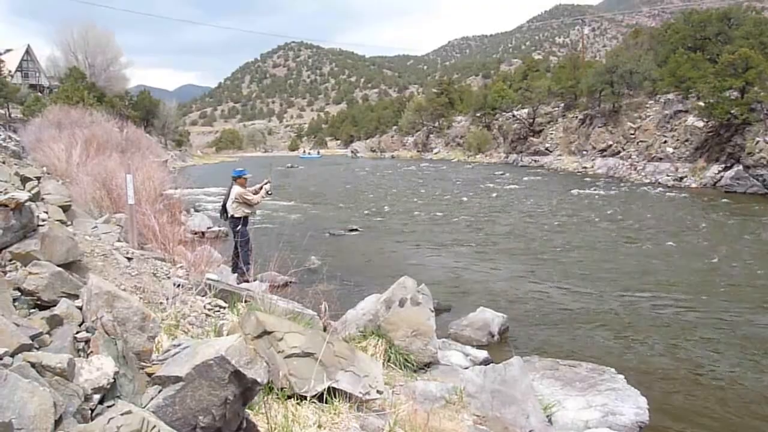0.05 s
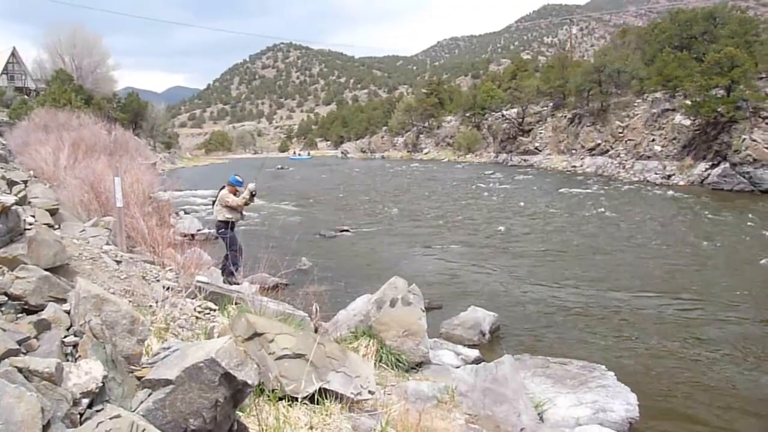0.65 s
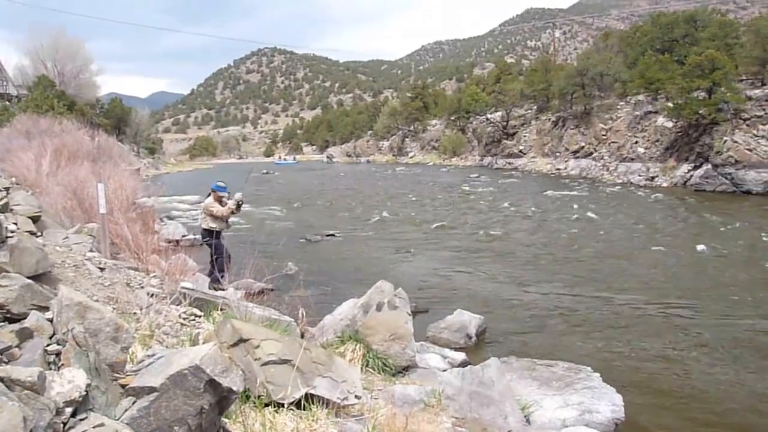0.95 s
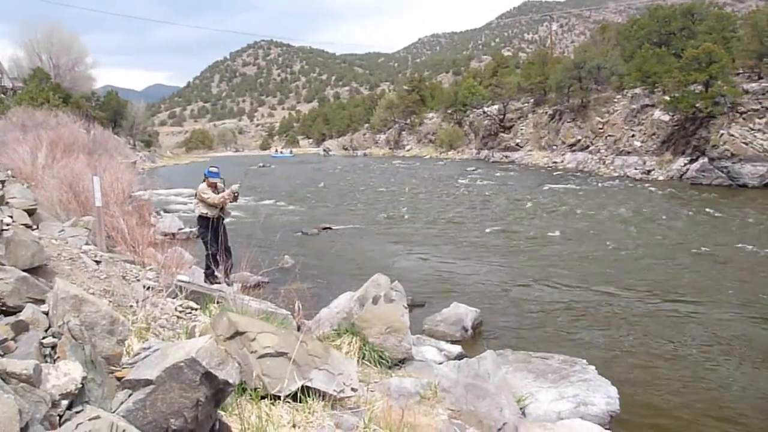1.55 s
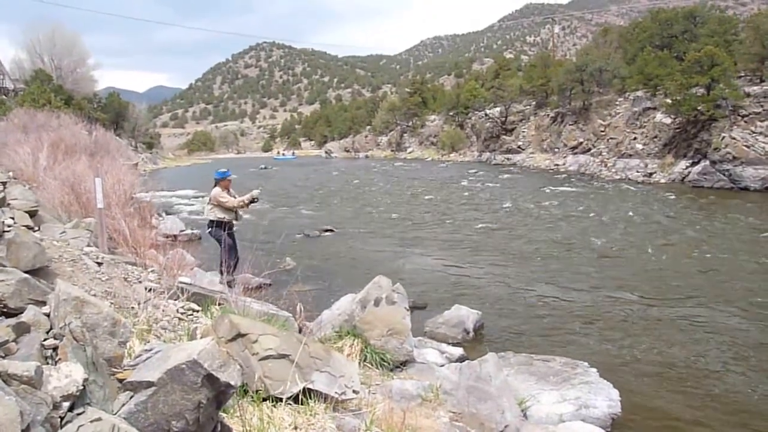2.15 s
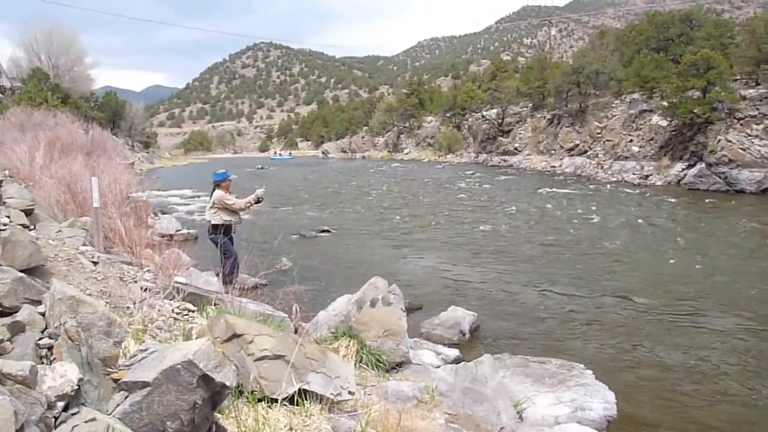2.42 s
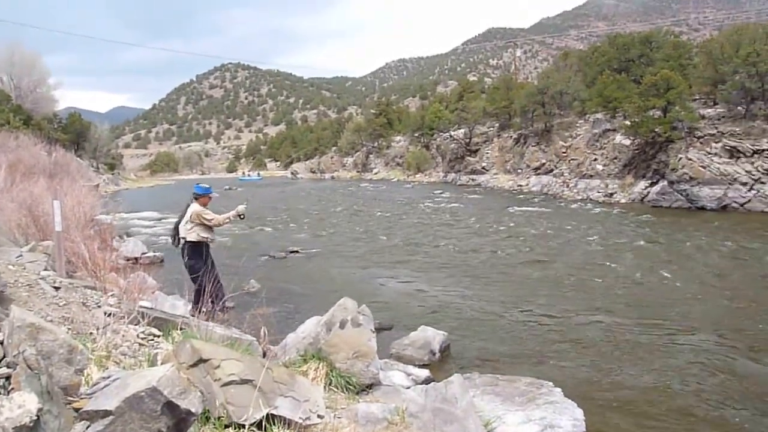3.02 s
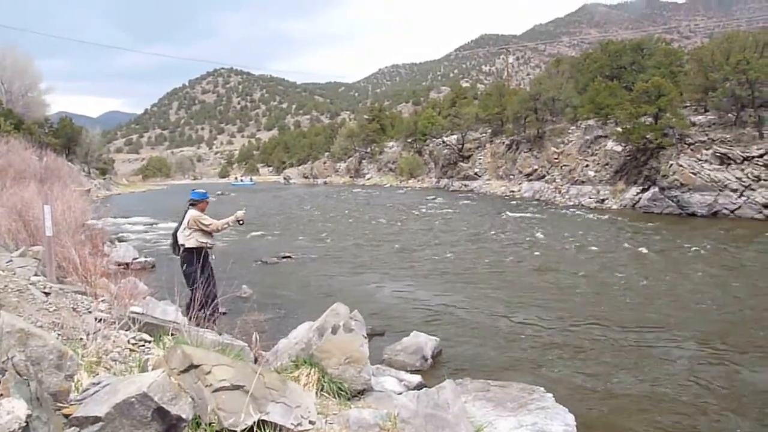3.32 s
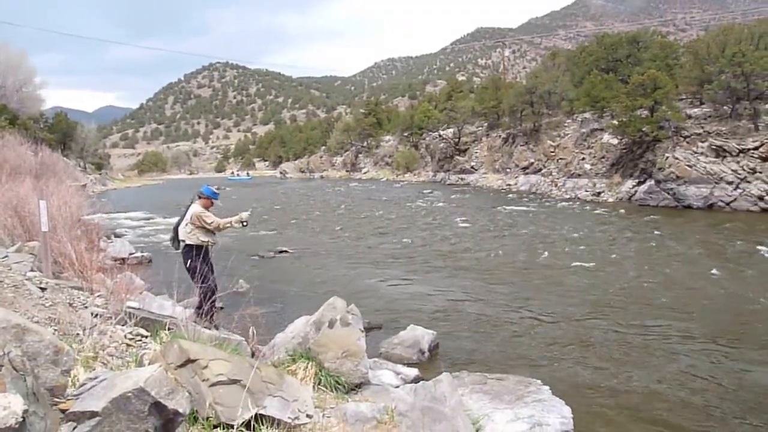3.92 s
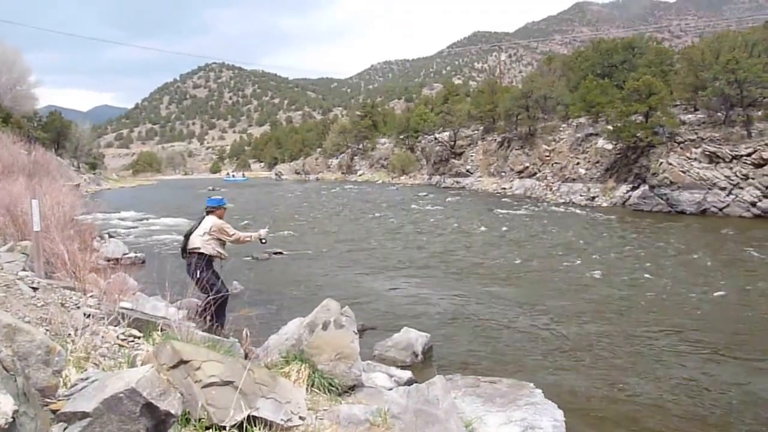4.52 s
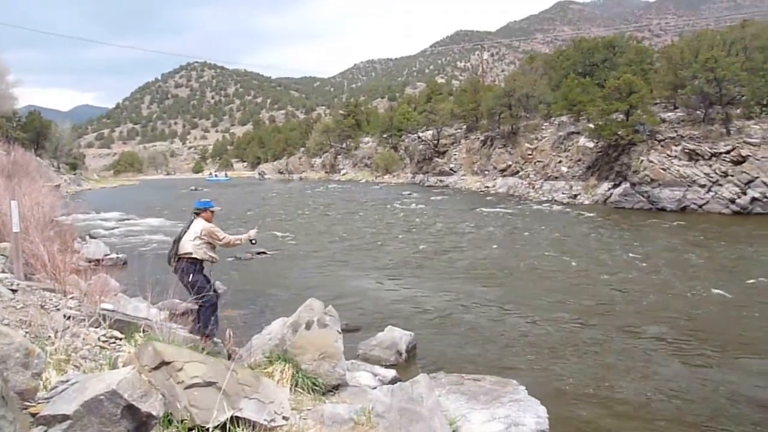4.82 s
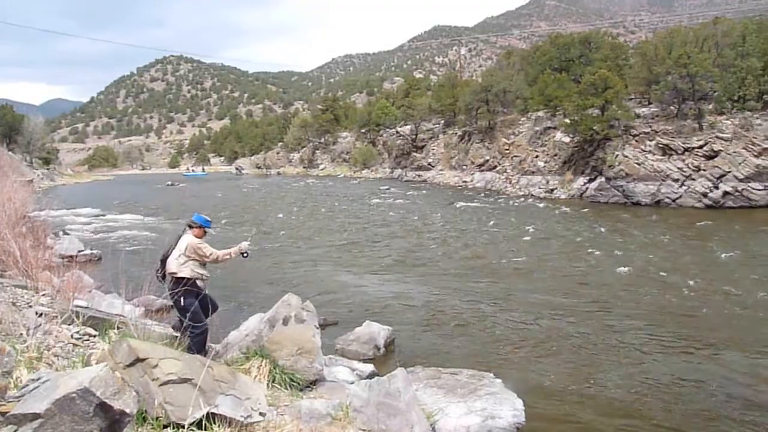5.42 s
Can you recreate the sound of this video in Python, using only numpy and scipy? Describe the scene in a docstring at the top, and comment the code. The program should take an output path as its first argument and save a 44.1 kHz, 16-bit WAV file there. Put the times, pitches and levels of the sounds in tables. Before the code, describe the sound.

A wide river rushes steadily while a gust of wind rumbles and thumps on the microphone, then dies away.

```python
"""A wide, quick river, heard from its rocky bank on the microphone of a small hand-held camera.
From the start, distant riffles churn and burst into countless bubbles over the camera's own hiss and whine.
After about a second a gust crosses the microphone: it rumbles, and its eddies thump the diaphragm.
The gust dies away around four seconds; one last eddy hits near five, and the water rushes on."""
import sys
import numpy as np
from scipy import signal
from scipy.fft import rfft, irfft, next_fast_len
from scipy.io import wavfile
from scipy.ndimage import uniform_filter1d

SR = 44100
rng = np.random.default_rng(int(sys.argv[2]) if len(sys.argv) > 2 else 0)


def transcribe(signal):
    """Save signal, clipped to [-1, 1], as a 16-bit WAV file at the path in sys.argv[1]."""
    frames = np.atleast_2d(signal).T
    limited = np.clip(frames, -1, 1)
    pcm = np.round(limited * 32767).astype(np.int16)
    wavfile.write(sys.argv[1], SR, pcm)


N = 249606
TIME = np.arange(N) / SR


def undb(db):
    """Decibels to gain."""
    return 10 ** (np.asarray(db) / 20)


def level(x, db):
    """Scale a sound to an rms level."""
    return x * undb(db) / np.sqrt(np.mean(x ** 2))


def colour(x, spectrum):
    """Filter by a curve through rows of frequency_hz, gain_db."""
    hz, db = np.transpose(spectrum)
    size = next_fast_len(N)
    bin_hz = np.maximum(np.fft.rfftfreq(size, 1 / SR), 1)
    gain = undb(np.interp(np.log(bin_hz), np.log(hz), db))
    return irfft(rfft(x, size) * gain, size)[:N]


def wander(rate_hz):
    """A smooth random drift that takes a new course rate_hz times a second."""
    hold = max(int(SR / rate_hz), 1)
    steps = np.repeat(rng.standard_normal(N // hold + 2), hold)
    start = rng.integers(hold)
    return 0.88 * uniform_filter1d(steps[start:start + N], hold)


def preamplifier():
    """The camera's noise floor: a steady hiss and a thin electronic whine."""
    # spectrum of the hiss: frequency_hz, gain_db
    hiss_spectrum = [(100, 1), (3500, 3), (5500, 0.5), (7000, -0.5), (7800, -4), (8500, -9), (9100, -17.5),
                     (9700, -35.5)]
    # tones of the whine: pitch_hz, rms_db
    whine_tones = [(5333.5, -93), (6666.6, -87), (9333.4, -107)]
    hiss = level(colour(rng.standard_normal(N), hiss_spectrum), -67.0)
    whine = sum(np.sqrt(2) * undb(db) * np.sin(2 * np.pi * hz * TIME) for hz, db in whine_tones)
    return hiss + whine


def airflow():
    """Wind strength at the microphone: an easing breeze, one broad gust, buffets that rise, hold and die."""
    # buffets of wind on the microphone: start_s, length_s, relative_level_db
    buffets = [(1.222, .16, -37), (1.538, 0.038, -44), (1.792, 0.043, -36), (1.878, 0.11, -33),
               (2.052, 0.046, -34.5), (2.218, 0.029, -39.5), (2.488, .125, -41), (2.751, .05, -35),
               (2.866, 0.043, -31), (3.124, 0.052, -36.5), (3.241, 0.054, -39), (3.345, 0.042, -43.5),
               (3.952, .05, -47), (4.11, .13, -51.5)]
    attack_s, release_s = .012, .015
    gust_peak_s, gust_width_s = 2.55, .62
    breeze = undb(-57.5 - .9 * TIME + 3.2 * wander(5))
    gust = undb(-46) * np.exp(-((TIME - gust_peak_s) / gust_width_s) ** 2 / 2)
    power = breeze ** 2 + gust ** 2
    for start_s, length_s, db in buffets:
        early_s = np.maximum(start_s - TIME, 0)
        late_s = np.maximum(TIME - start_s - length_s, 0)
        power += (undb(db) * np.exp(-early_s / attack_s - late_s / release_s)) ** 2
    return np.sqrt(power)


def wind_rumble():
    """Turbulence right at the microphone port rumbles and flutters with the airflow."""
    # spectrum of the turbulence: frequency_hz, gain_db
    rumble_spectrum = [(15, -11.5), (35, -2), (60, 2.5), (120, 0), (190, -5), (300, -13), (600, -30.5),
                       (1200, -74)]
    rumble = level(colour(rng.standard_normal(N), rumble_spectrum), 1.4)
    return rumble * airflow() * undb(1.2 * wander(35))


def eddy_thumps():
    """Single hard eddies briefly push and pull the microphone's diaphragm."""
    # eddies hitting the diaphragm: centre_s, relative_peak_db, half_length_s
    eddies = [(1.338, -23, 0.01), (1.804, -21.5, 0.0035), (1.89, -14.5, 0.0049), (1.93, -10.5, 0.0022),
              (1.982, -18, .002), (2.23, -30.5, 0.006), (2.501, -22.5, 0.0037), (2.583, -20.5, 0.0034),
              (2.882, -16.5, 0.0065), (3.003, -30, .002), (3.152, -26.5, .004), (5.096, -27, 0.0014)]
    thumps, push = np.zeros(N), np.zeros(N)
    for (centre_s, db, half_s), phase in zip(eddies, rng.random(len(eddies))):
        near = np.abs(TIME - centre_s) < 4 * half_s
        offset_s = TIME[near] - centre_s
        swell = undb(db) * np.exp(-(offset_s / half_s) ** 2 / 2)
        swing_hz = 197 + 2.5 * db  # weaker eddies swing more slowly
        thumps[near] += swell * np.sin(2 * np.pi * (swing_hz * offset_s + phase))
        push[near] += swell
    # the hardest eddies break up into smaller whirls, heard as a rough puff
    whirl_band = signal.butter(4, [220, 500], "bandpass", fs=SR, output="sos")
    whirls = level(signal.sosfilt(whirl_band, rng.standard_normal(N)), -5.5)
    return undb(-5.0) * thumps + whirls * push ** 1.52


def churn(surge_db, flicker_db, surge_hz, flicker_hz):
    """Far riffles merge into a roar; each half octave surges with its neighbours and flickers alone."""
    size = next_fast_len(N)
    edges_hz = 50 * 2 ** (np.arange(14) / 2)
    band_of_bin = np.searchsorted(edges_hz, np.fft.rfftfreq(size, 1 / SR))
    noise_bins = rfft(rng.standard_normal(size))
    roar = np.zeros(N)
    surge_below = wander(surge_hz)
    for band in range(len(edges_hz) + 1):
        surge_above = wander(surge_hz)
        surge = (surge_below + surge_above) / np.sqrt(2)
        band_noise = irfft(noise_bins * (band_of_bin == band), size)[:N]
        roar += band_noise * undb(surge_db * surge + flicker_db * wander(flicker_hz))
        surge_below = surge_above
    return roar


def bubbles(low_hz, high_hz, ring_cycles, glide, spread_db, count):
    """Trapped air rings briefly, rising in pitch as it nears the surface."""
    gurgle = np.zeros(N)
    for when, pitch_position, chance, phase in rng.random((count, 4)):
        hz = low_hz * (high_hz / low_hz) ** pitch_position
        start = int(when * N)
        length = min(int(ring_cycles * SR / hz), N - start)
        age_cycles = np.arange(length) * hz / SR
        turns = age_cycles * (1 + glide * age_cycles / ring_cycles / 2)
        decay = undb(-60 * age_cycles / ring_cycles)
        # many weak ones, few strong ones; short high rings need more height for the same loudness
        height = hz * undb(-spread_db * np.log(max(chance, 1e-2)))
        gurgle[start:start + length] += height * decay * np.sin(2 * np.pi * (turns + phase))
    return gurgle


def river():
    """Roar and bubbles reach the bank with the dull colour of water heard across a distance."""
    # spectrum of churning white water: frequency_hz, gain_db
    water_spectrum = [(25, -25.5), (75, -13.5), (145, -5.5), (235, -1), (290, -3), (345, 0.5), (430, -2),
                      (560, 0), (780, -3), (1050, -7), (1700, -14), (2400, -22.5), (3300, -31.5),
                      (4500, -67)]
    # rise and fall of the river at the bank: time_s, relative_level_db
    flow = [(0, -49), (.65, -43.5), (1.45, -43.5), (1.85, -42), (3.2, -42.5), (3.6, -41), (3.85, -42),
            (4.7, -41.5), (5.05, -42.6), (5.3, -41.5), (5.66, -42.5)]
    roar = churn(surge_db=.47, flicker_db=.5, surge_hz=4.3, flicker_hz=18)
    roar = level(colour(roar, water_spectrum), .99)
    gurgle = bubbles(low_hz=209.6, high_hz=3200, ring_cycles=19, glide=.15, spread_db=2.0, count=7000)
    gurgle = level(colour(gurgle, water_spectrum), -5.5)
    water = (roar + gurgle) * undb(np.interp(TIME, *np.transpose(flow)))
    # the water slowly brightens as the camera turns toward the river
    treble = signal.sosfiltfilt(signal.butter(2, 1200, "highpass", fs=SR, output="sos"), water)
    treble_gain = undb(-1.1 + .3557 * TIME)
    return water + treble * (treble_gain - 1)


def scene():
    """The river out front, wind on the microphone and the camera's noise floor, in mono."""
    return (river() + wind_rumble() + eddy_thumps() + preamplifier())[None]


def record(dry):
    """The camera sheds the deepest bass and cuts the top; its converter rests slightly below zero."""
    low_cut = signal.butter(1, 18, "highpass", fs=SR, output="sos")
    high_cut = signal.ellip(8, .2, 70, 9700, fs=SR, output="sos")
    dc_offset = -.0062
    return signal.sosfilt(high_cut, signal.sosfilt(low_cut, dry)) + dc_offset


dry = scene()
out = record(dry)
transcribe(out)
```